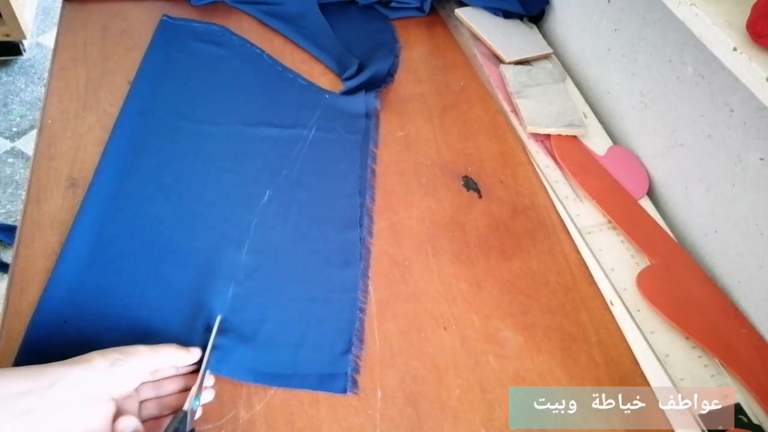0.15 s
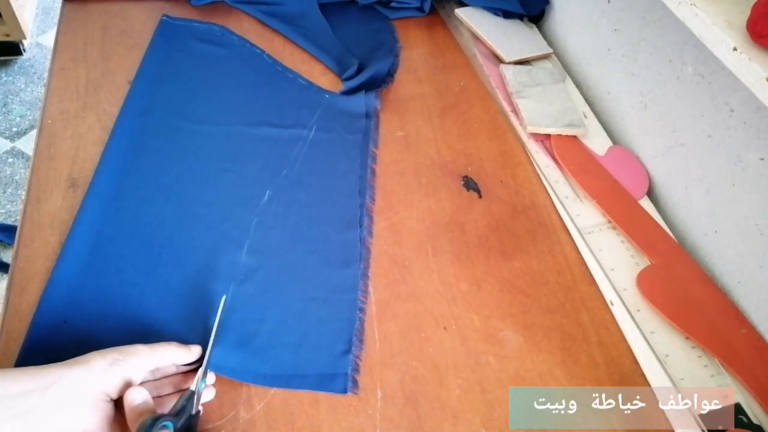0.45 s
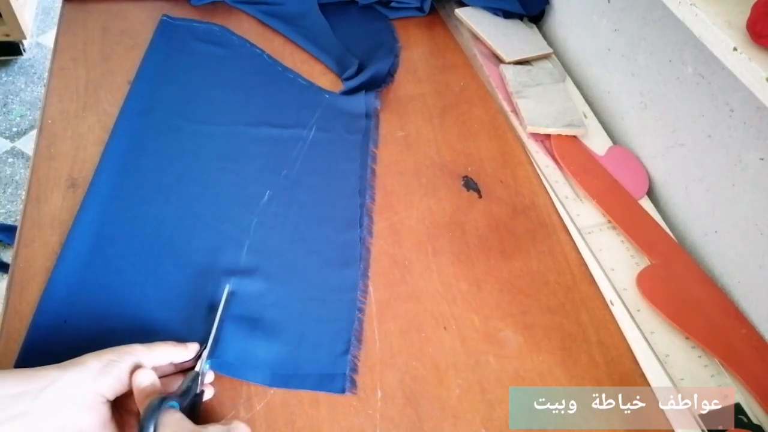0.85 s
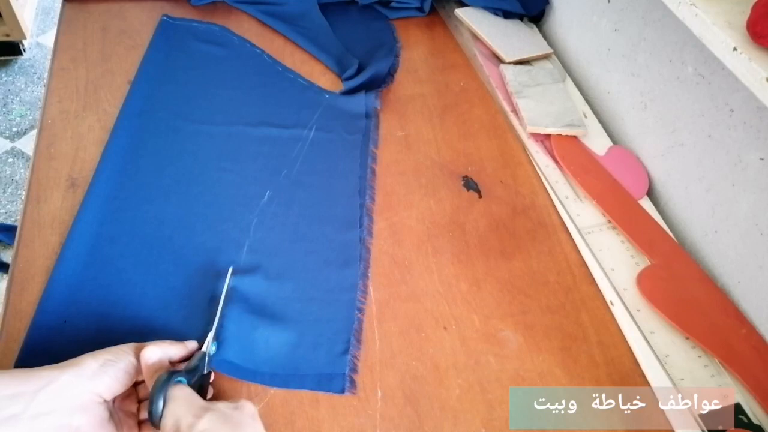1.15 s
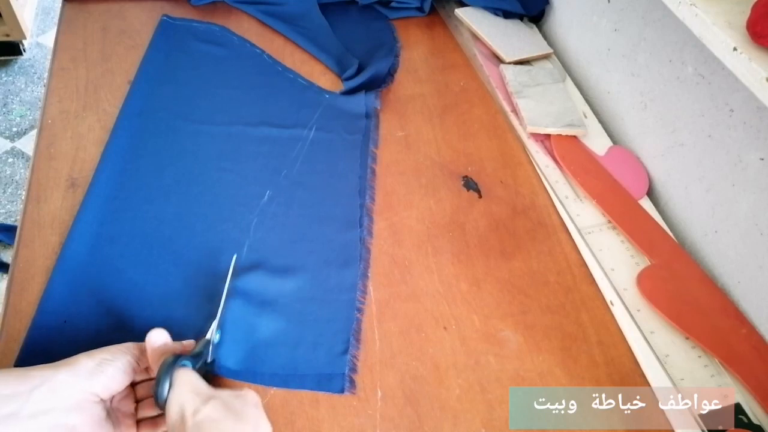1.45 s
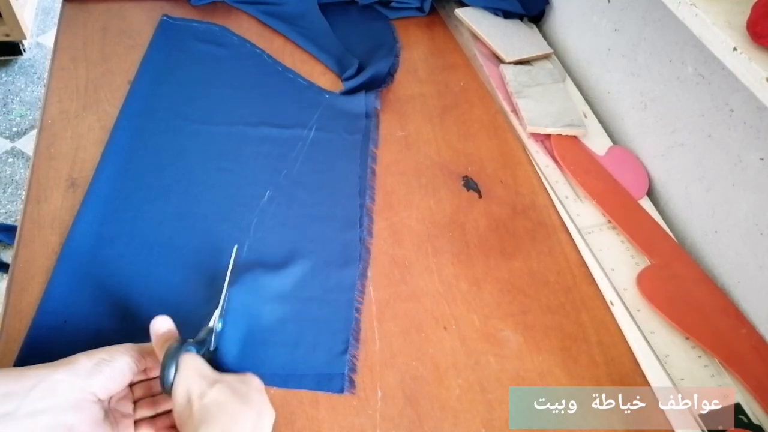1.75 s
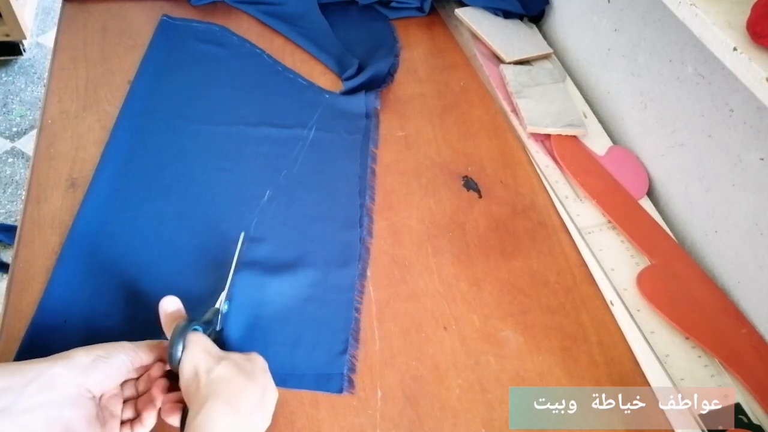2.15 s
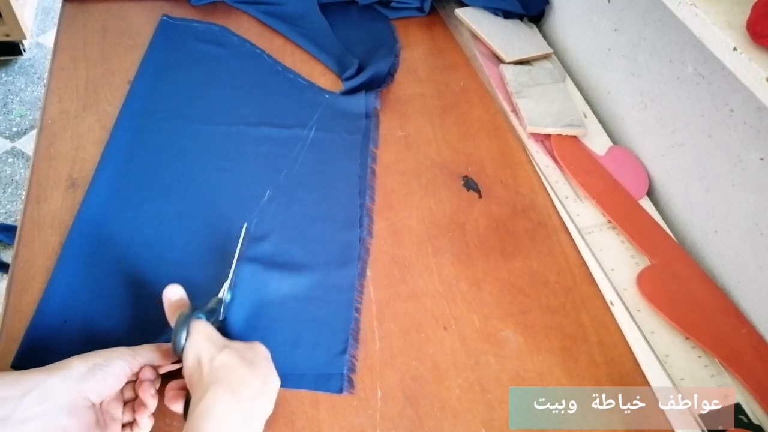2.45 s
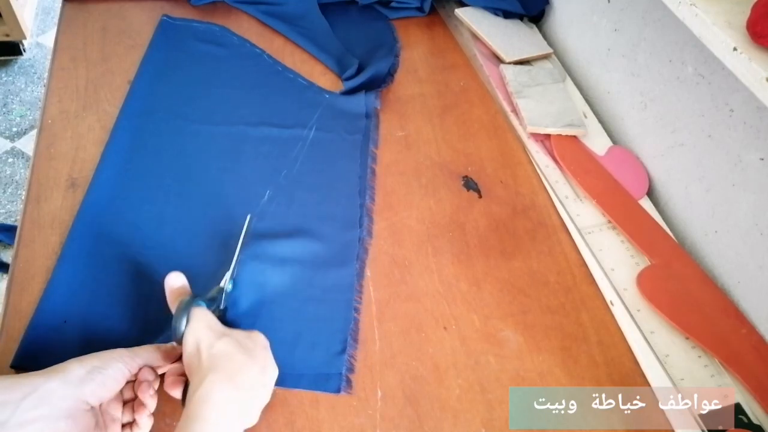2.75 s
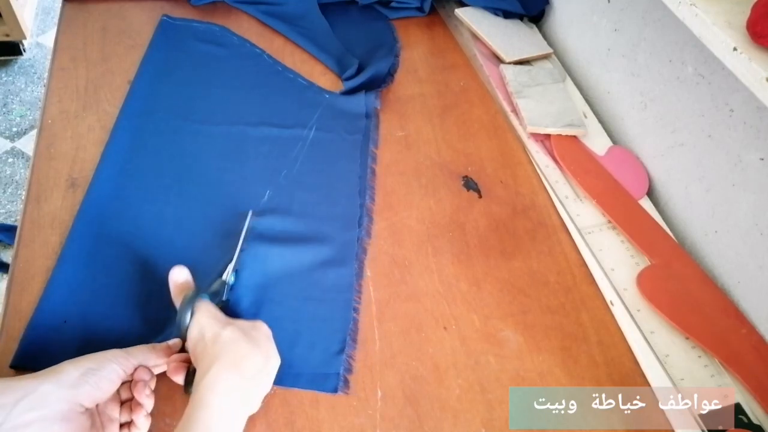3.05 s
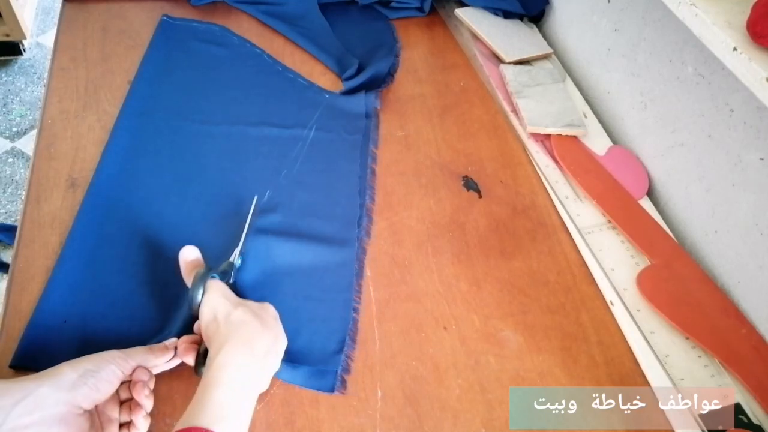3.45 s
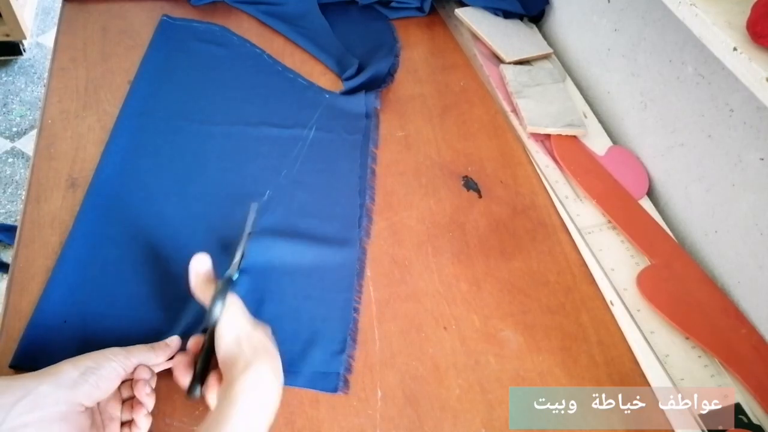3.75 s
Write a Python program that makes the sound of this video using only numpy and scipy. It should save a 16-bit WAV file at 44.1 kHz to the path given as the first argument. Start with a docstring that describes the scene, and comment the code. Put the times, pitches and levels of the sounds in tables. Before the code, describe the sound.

Tailor's scissors crunch through fabric about three times a second, drumming dully on a wooden tabletop

```python
"""Scissors through woven cloth

Tailor's scissors cut cloth on a wooden table in eleven quick strokes, close by in a small room.
Each stroke is a burst of random thread snaps: they rasp in the blades and drum in the table.
The blades reopen with a dull rub of small slips, tick in hard blows that ring the table,
and slide through the cloth as a hiss of dense impulses. Faint noise lies beneath."""
import sys
import numpy as np
from scipy import signal
from scipy.fft import rfft, irfft, next_fast_len
from scipy.io import wavfile
from scipy.ndimage import uniform_filter1d, map_coordinates

SR = 44100
rng = np.random.default_rng(int(sys.argv[2]) if len(sys.argv) > 2 else 0)


def persist_wave(psi):
    """Save psi, clipped to +-1, as 16-bit WAV."""
    counts = np.round(np.clip(psi, -1, 1) * 32767).astype(np.int16)
    wavfile.write(sys.argv[1], SR, np.atleast_2d(counts).T)


N = 171990

# Event levels are relative; colour tables give spectral shape only.
# Closing strokes: t/s, length/s, hardest point/share of length, table level/dB, thump level/dB,
# crunch level/dB, crunch f/Hz, rasp level/dB, rasp f/Hz, fizz level/dB
CUTS = [(0.189, 0.073, 0.96, -28.5, -27, -49, 1050, -49, 5800, -46.5),
        (0.565, 0.077, 0.83, -27.5, -31.5, -44, 1410, -55, 6400, -48),
        (0.913, 0.097, 0.54, -31, -33.5, -43, 2380, -45.5, 6500, -46.5),
        (1.25, 0.072, 0.85, -28, -38.5, -42, 2580, -46.5, 6580, -47),
        (1.603, 0.071, 0.69, -28.5, -39, -47, 2400, -44.5, 6770, -48),
        (1.947, 0.062, 0.66, -29.5, -38.5, -53.5, 1800, -50, 6750, -50),
        (2.286, 0.054, 0.73, -39, -50, -59, 1520, -51.5, 7000, -50),
        (2.615, 0.075, 0.63, -29.5, -40, -49, 1730, -48.5, 6400, -54),
        (2.949, 0.058, 0.87, -27, -40, -47.5, 1800, -46.5, 6300, -49),
        (3.292, .062, .84, -28.5, -33.5, -49, 1760, -39.5, 5660, -47.5),
        (3.596, 0.052, 0.63, -28.5, -32, -43.5, 1600, -46.5, 6300, -46.5)]
# Reopening strokes: t/s, length/s, table level/dB, scrape level/dB
OPENS = [(.412, 0.026, -38.5, -47.5), (.765, 0.024, -33.5, -54.5), (1.099, 0.037, -38, -51.5),
         (1.446, 0.022, -36, -54), (1.779, 0.02, -37, -67), (2.118, 0.026, -37, -83),
         (2.47, 0.02, -35, -59), (2.797, 0.044, -38, -58.5), (3.139, 0.035, -40.5, -65),
         (3.472, 0.035, -41, -98), (3.778, 0.033, -44, -58)]
# Hard blade contacts: t/s, knock level/dB, clack level/dB, steel level/dB
TICKS = [(.412, -22.5, -44, -44), (.743, -42.5, -37, -61), (0.866, -41, -36, -65), (0.934, -33, -34, -44),
         (1.418, -37.5, -42, -73), (2.048, -34, -53, -66), (2.3272, -22, -23, -41.5)]
# Blades sliding on cloth: t/s, length/s, level/dB
SLIDES = [(0.153, 0.11, -66), (0.671, 0.4, -59), (1.009, 0.11, -55), (1.166, 0.24, -63),
          (1.796, 0.18, -74.5), (2.808, 0.23, -70.5), (3.049, 0.094, -65.5), (3.392, 0.14, -61),
          (3.72, 0.092, -61)]

# Table colour under cutting: f/Hz, level/dB
TABLE_COLOUR = [(50, -17.5), (90, -14.5), (150, -7), (240, -2.5), (290, -2.5), (390, 2), (500, -6.5),
                (620, -2.5), (720, -8), (850, -7.5), (1050, -16.5), (1400, -28.5), (2500, -35), (6000, -63)]
# Low thump colour: f/Hz, level/dB
THUMP_COLOUR = [(35, 8), (55, -31.5), (75, 4.5), (130, 1), (170, -0.5), (240, -11), (350, -17), (700, -51),
                (2000, -77)]
# Fibre fizz colour: f/Hz, level/dB
FIZZ_COLOUR = [(3900, -16), (5000, 18), (8000, 0), (9200, 0.5), (10800, 3), (12500, 7), (14000, -7),
               (15500, -1)]
# Table colour under the reopening rub: f/Hz, level/dB
RUB_COLOUR = [(50, -45.5), (80, 2), (170, -0.5), (280, -3.5), (380, 5), (580, -5), (850, -6), (1050, -16),
              (1400, -35.5), (3000, -77)]
# Reopening scrape colour: f/Hz, level/dB
SCRAPE_COLOUR = [(600, -7), (1200, 8.5), (1800, -4.5), (2700, -10), (3900, -21), (7000, -27.5)]
# Table colour under a blow: f/Hz, level/dB
KNOCK_COLOUR = [(60, -17.5), (170, 9), (380, 7.5), (600, 5.5), (830, 12.5), (1100, -7.5), (1500, -29),
                (3000, -64.5)]
# Mid-range clack colour of a blow: f/Hz, level/dB
CLACK_COLOUR = [(300, -35), (800, 4), (1250, 5.5), (2000, -7.5), (2700, -15), (4000, -22.5), (9000, -47.5)]
# Steel colour, ticks and slides: f/Hz, level/dB
STEEL_COLOUR = [(1500, -18), (2700, -9), (4000, -16), (5200, -10.5), (6200, -9.5), (7000, -6.5),
                (7900, -15.5), (10000, -38), (15000, -37)]
# Dip in the blades' sound: f/Hz, level/dB
HOLLOW_COLOUR = [(3400, 2.5), (3950, -2.5), (4600, 2)]
# Blade resonances: f/Hz, level re excitation/dB, t60/s
BLADE_MODES = [(2760, -18, .16), (3260, -18, .2)]
# Table resonances: f/Hz, level re excitation/dB, t60/s
BOARD_MODES = [(74, -17.5, 0.25), (121, -20.5, 0.44), (242.2, -20.5, 0.6), (381, -24, 0.34),
               (507.5, -24, .14), (603.3, -17.5, 0.1), (837.3, -22.5, 0.11)]
# Table resonances under a hard blow: f/Hz, level re blow/dB, t60/s
KNOCK_MODES = [(340, -4, 0.075), (405, -4.5, 0.13), (590, -9, 0.032), (840.6, -6.5, 0.082),
               (1050, -12, 0.058), (1248, -14, 0.072)]

# Room decay: f/Hz, t60/s
ROOM_T60 = [(80, 0.53), (300, 0.33), (1000, 0.31), (3000, 0.4), (7000, 0.28), (14000, 0.18)]
# Left-right likeness of room and noise: f/Hz, correlation/1
ROOM_ALIKE = [(30, 0.27), (80, 0.85), (300, 0.99), (600, 0.12), (1500, 0.017), (4000, 0.015)]
# Table scatter, mostly treble: f/Hz, level/dB
SCATTER_COLOUR = [(200, -27.5), (600, -3.5), (1500, -5), (4000, 5), (12000, -0.5)]
# Left over right: f/Hz, level difference/dB
LEAN = [(150, -0.5), (290, 5.5), (450, 2), (740, 3), (1200, 2.5), (2200, -1.5), (3300, 4.5), (5500, 3),
        (7000, 13), (8800, -13.5), (10500, -3), (12500, 1.5)]
# Background noise colour: f/Hz, level/dB
FLOOR_COLOUR = [(25, -10), (45, 9), (100, -2.5), (250, -13.5), (500, -12.5), (1000, -17.5), (2500, -25),
                (4000, -28), (7000, -27.5), (15000, -38.5)]

THREADS_PER_S, THREAD_SPREAD_DB = 2600, 1
CLUMPS_PER_S, CLUMP_DB = 265, 2  # the weave gives way in bunches
ATTACK_S, RELEASE_S = 0.016, 0.012
PRESS_DB, RASP_SWELL_DB, FIZZ_SWELL_DB = 12, 5, 19  # growth as the blades bear down
EASE_DB = 2.5  # drop after the hardest point
THUMP_LAG_S, THUMP_RELEASE_S, FIZZ_RELEASE_S = 0.01135, 0.036, 0.022
RASP_WIDTH_OCT, RASP_SKIRT_DB = 0.34, -69.5
CRUNCH_WIDTH_OCT, CRUNCH_SKIRT_DB = 0.34, -15
SLIPS_PER_S, SLIP_SPREAD_DB = 900, 7
OPEN_ATTACK_S, OPEN_RELEASE_S, OPEN_SWELL_DB = 0.001, 0.014, 0.5
ROOM_LOW_DB, ROOM_HIGH_DB = -3.5, -4  # tail re direct: table, blades
EARLY_DB, EARLY_S = 0, 0.0042  # scatter re direct, decay constant
LEAD_S = 0.00008  # the left microphone is nearer
FLOOR_DB = -58.5
LOW_CUT_HZ, TOP_HZ = 54, 15700


def amp(db):
    """Amplitude factor of a level in dB."""
    return 10 ** (np.asarray(db) / 20)


def along(points, hz):
    """Interpolate (Hz, value) points on a log frequency axis."""
    f, v = np.transpose(points)
    return np.interp(np.log(hz + 1), np.log(f + 1), v)


def filtered(x, response):
    """x times a complex response of frequency."""
    m = next_fast_len(N + SR // 2)
    spectrum = rfft(x, m) * response(np.fft.rfftfreq(m, 1 / SR))
    return irfft(spectrum, m)[..., :N]


def convolved(x, h):
    """x through the impulse response h."""
    return signal.fftconvolve(x, h, axes=-1)[..., :N]


def body(level_db, size=4096):
    """Minimum-phase impulse response of energy 1 from a level over frequency."""
    cepstrum = irfft(np.log(amp(level_db(np.fft.rfftfreq(size, 1 / SR)))))
    cepstrum[1:size // 2] *= 2
    cepstrum[size // 2 + 1:] = 0
    h = irfft(np.exp(rfft(cepstrum)))
    return h / np.linalg.norm(h)


def coloured(x, points):
    """x through a body with this spectrum."""
    return convolved(x, body(lambda hz: along(points, hz)))


def band(centre_hz, width_oct, skirt_db):
    """Impulse response of one broad resonance: Gaussian over octaves, plus a flat skirt."""
    def level_db(hz):
        octaves = np.log2((hz + 1) / centre_hz)
        return 20 * np.log10(np.exp(-0.5 * (octaves / width_oct) ** 2) + amp(skirt_db))
    return body(level_db)


def ringing(x, modes):
    """Decaying sines set off by x, each at its level re the rms of x."""
    t = np.arange(SR // 2) / SR
    total = 0
    for hz, db, t60 in modes:
        ring = convolved(x, np.sin(2 * np.pi * hz * t) * amp(-60 * t / t60))
        total = total + amp(db) * ring * x.std() / ring.std()
    return total


def add(track, s, x):
    """Mix x into the track at time s."""
    part = track[max(round(s * SR), 0):][:len(x)]
    part += x[:len(part)]


def stroke(length, attack, release, swell_db, fade_db, crest=0.39):
    """Envelope of one hand movement: rise, swell to the crest, ease off, release."""
    t = np.arange(SR // 2) / SR
    rise = np.sin(np.pi / 2 * np.minimum(t / attack, 1)) ** 2
    effort_db = np.interp(t / length, [0, np.clip(crest, 0.05, 0.98), 1], [-swell_db, 0, -fade_db])
    return rise * amp(effort_db) * np.exp(-np.maximum(t - length, 0) / release)


def snaps(rate, spread_db):
    """Half a second of unevenly spaced tiny impulses, rms 1."""
    n = SR // 2
    chance, size, sign = rng.random(n), rng.standard_normal(n), rng.choice([-1, 1], n)
    x = (chance < rate / SR) * amp(spread_db * np.clip(size, -2, 2)) * sign
    return x / (x.std() + 1e-9)


def clumps():
    """Half a second of smoothly uneven gain, rms 1."""
    knots = np.arange(SR // 2) * CLUMPS_PER_S / SR
    gain = amp(CLUMP_DB * map_coordinates(rng.standard_normal(size=1024), [knots]))
    return gain / np.sqrt(np.mean(gain ** 2))


def steadied(x, size=660):
    """x held near rms 1 over about 15 ms, leaving only its fine grain uneven."""
    return x / np.sqrt(np.abs(uniform_filter1d(x ** 2, size)) + 1e-3)


def paired(noise, alike):
    """Mix two unrelated noises into a left and a right of this likeness."""
    def mid_side(hz):
        turn = np.arccos(np.clip(along(alike, hz), -1, 1)) / 2
        return np.array([np.cos(turn), np.sin(turn)])
    mid, side = filtered(noise, mid_side)
    return np.array([mid + side, mid - side])


def background():
    """Steady coloured stereo noise, alike in the ears mostly in the bass."""
    noise = paired(rng.standard_normal((2, N)), ROOM_ALIKE)
    air = filtered(noise, lambda hz: amp(along(FLOOR_COLOUR, hz)))
    return amp(FLOOR_DB) * air / air.std()


def room(x, wet_db):
    """Direct sound, table scatter and decaying tail; both change as the scissors move on."""
    n = SR // 2
    out = np.array([x, x])
    scatter = body(lambda hz: along(SCATTER_COLOUR, hz))
    early_decay = np.exp(-np.arange(n) / SR / EARLY_S)
    edges = [0] + [round(cut[0] * SR) for cut in CUTS[1:]] + [N]
    noise = paired(rng.standard_normal((2, N)), ROOM_ALIKE)
    for k, (a, b) in enumerate(zip(edges, edges[1:])):
        part = noise[:, k * (N - n) // len(CUTS):][:, :n]
        hz, t, z = signal.stft(part, SR, nperseg=256)
        decay = amp(-60 * t / along(ROOM_T60, hz)[:, None])
        tail = signal.istft(z * decay, SR, nperseg=256)[1][:, :n]
        early = convolved(rng.standard_normal((2, n)) * early_decay, scatter[None])[:, :n]
        h = amp(wet_db) * tail / np.linalg.norm(tail[0])
        h = h + amp(EARLY_DB) * early / np.linalg.norm(early[0])
        for ear, answer in zip(out, convolved(x[None, a:b], h)):
            add(ear, a / SR, answer)
    return out


def placed(near):
    """Level lean per frequency and a small left lead put the source off centre."""
    side = np.array([[0.5], [-0.5]])
    return filtered(near, lambda hz: amp(side * along(LEAN, hz)) * np.exp(2j * np.pi * hz * side * LEAD_S))


def sliding():
    """Cloth hisses along the steel as the scissors advance: dense impulses, steel colour."""
    hiss = np.zeros(N)
    for s, length, db in SLIDES:
        advance = stroke(length, attack=0.022, release=0.046, swell_db=3.0, fade_db=5.0)
        add(hiss, s, amp(db) * snaps(rate=7000, spread_db=7.5) * advance)
    return coloured(hiss, STEEL_COLOUR)


def ticking(chatter_s=0.0024, chatter_db=-19, blow_db=19):
    """Hard contacts, one blow and a brief chatter; returns table and blade shares."""
    knock, clack, steel = np.zeros((3, N))
    t = np.arange(SR // 20) / SR
    for s, knock_db, clack_db, steel_db in TICKS:
        chatter = amp(chatter_db) * rng.standard_normal(len(t)) * np.exp(-t / chatter_s)
        blow = amp(blow_db) * ((t == 0) + chatter)
        add(knock, s, amp(knock_db) * blow)
        add(clack, s, amp(clack_db) * blow)
        add(steel, s, amp(steel_db) * blow)
    table = coloured(knock, KNOCK_COLOUR) + ringing(knock, KNOCK_MODES)
    return table, coloured(clack, CLACK_COLOUR) + coloured(steel, STEEL_COLOUR)


def reopening():
    """The blades part in small slips that rub the table; returns table and blade shares."""
    table, scrape = np.zeros((2, N))
    for s, length, table_db, scrape_db in OPENS:
        parting = stroke(length, OPEN_ATTACK_S, OPEN_RELEASE_S, OPEN_SWELL_DB, fade_db=0)
        slips = steadied(snaps(SLIPS_PER_S, SLIP_SPREAD_DB)) * parting
        add(table, s, amp(table_db) * slips)
        add(scrape, s, amp(scrape_db) * slips)
    return coloured(table, RUB_COLOUR), coloured(scrape, SCRAPE_COLOUR)


def cutting():
    """Threads snap between the closing blades; returns table and blade shares."""
    table, thump, crunch, rasp, fizz = np.zeros((5, N))
    for s, length, crest, table_db, thump_db, crunch_db, crunch_hz, rasp_db, rasp_hz, fizz_db in CUTS:
        def effort(swell_db, release=RELEASE_S):
            return stroke(length, ATTACK_S, release, swell_db, EASE_DB, crest)
        weave = clumps()
        threads = steadied(weave * snaps(THREADS_PER_S, THREAD_SPREAD_DB))
        fibres = steadied(weave * snaps(THREADS_PER_S, THREAD_SPREAD_DB))
        bite = threads * effort(RASP_SWELL_DB)
        edge = band(rasp_hz, RASP_WIDTH_OCT, RASP_SKIRT_DB)
        cloth = band(crunch_hz, CRUNCH_WIDTH_OCT, CRUNCH_SKIRT_DB)
        add(table, s, amp(table_db) * threads * effort(PRESS_DB))
        add(thump, s + THUMP_LAG_S, amp(thump_db) * threads * effort(PRESS_DB, THUMP_RELEASE_S))
        add(crunch, s, amp(crunch_db) * convolved(bite, cloth))
        add(rasp, s, amp(rasp_db) * convolved(bite, edge))
        add(fizz, s, amp(fizz_db) * fibres * effort(FIZZ_SWELL_DB, FIZZ_RELEASE_S))
    wood = coloured(table, TABLE_COLOUR) + coloured(thump, THUMP_COLOUR)
    blades = crunch + ringing(crunch, BLADE_MODES) + rasp + coloured(fizz, FIZZ_COLOUR)
    return wood, blades


def scene():
    """Table and blades, each in the room, set off centre over the background noise."""
    wood, steel = np.sum([cutting(), reopening(), ticking()], axis=0)
    table = wood + ringing(wood, BOARD_MODES)
    blades = coloured(steel + sliding(), HOLLOW_COLOUR)
    near = room(table, ROOM_LOW_DB) + room(blades, ROOM_HIGH_DB)
    return amp(-2.5) * placed(near) + background()


def record(dry):
    """The recorder thins the deepest bass and keeps nothing above its band limit."""
    return filtered(dry, lambda hz: (hz < TOP_HZ) * hz ** 3 / np.sqrt(hz ** 6 + LOW_CUT_HZ ** 6))


dry = scene()
out = record(dry)
persist_wave(out)
```